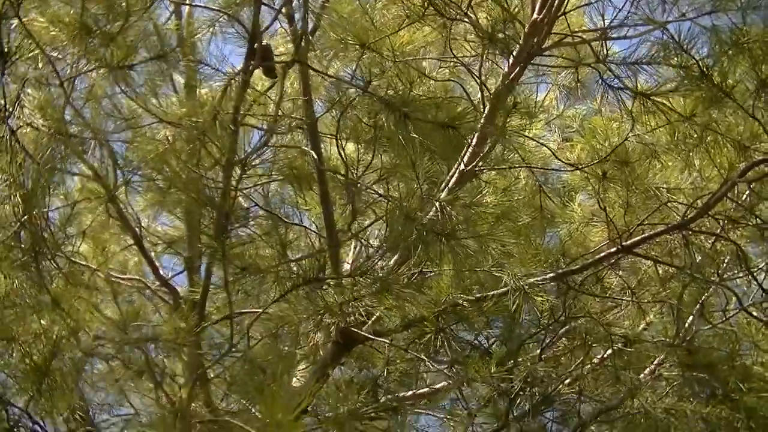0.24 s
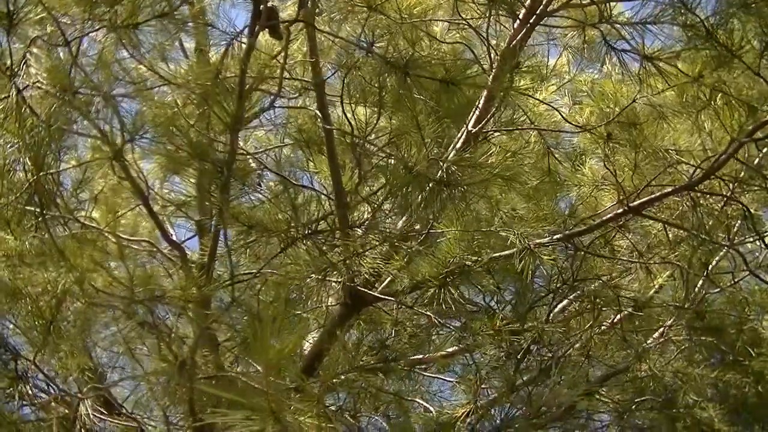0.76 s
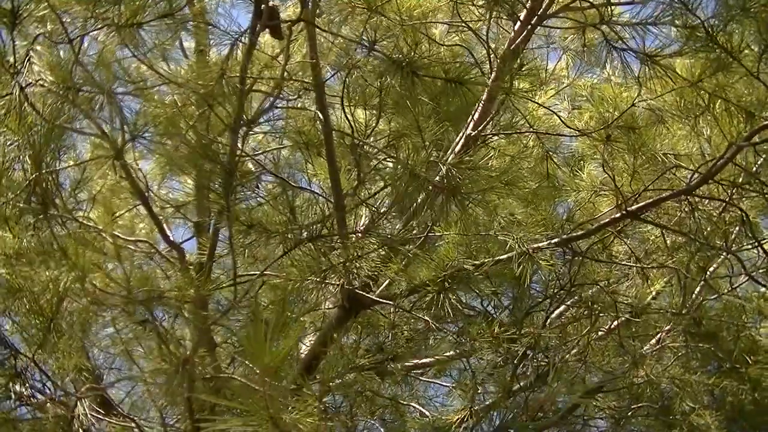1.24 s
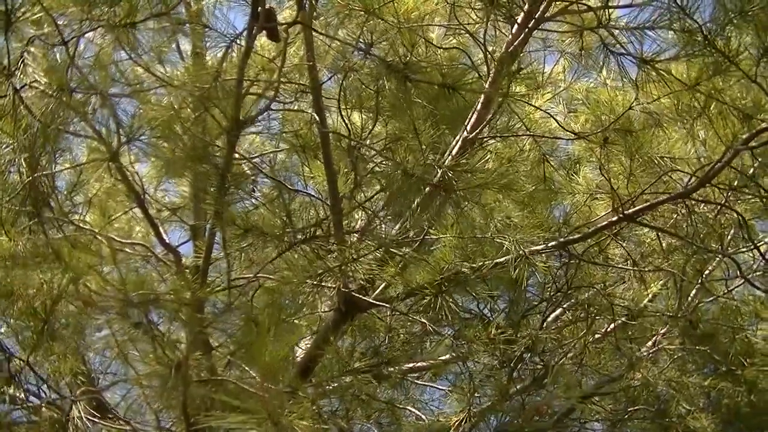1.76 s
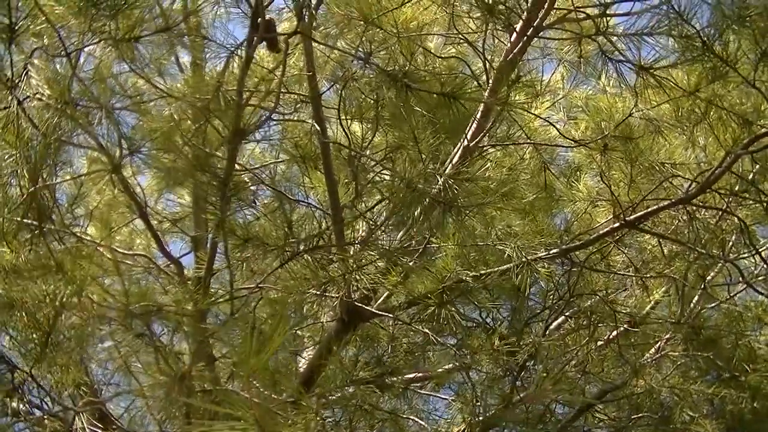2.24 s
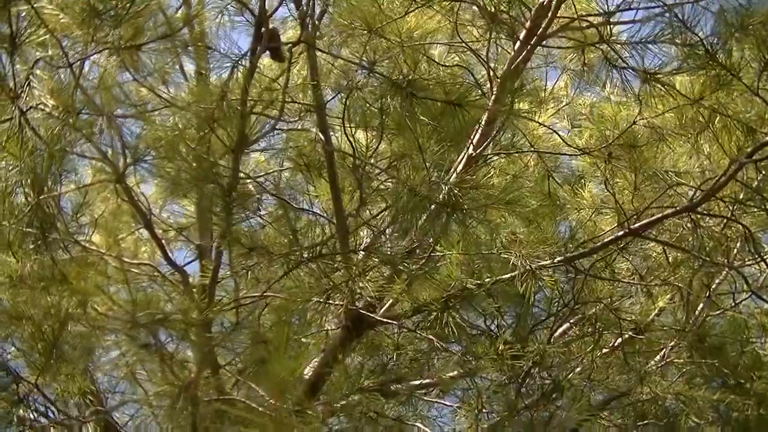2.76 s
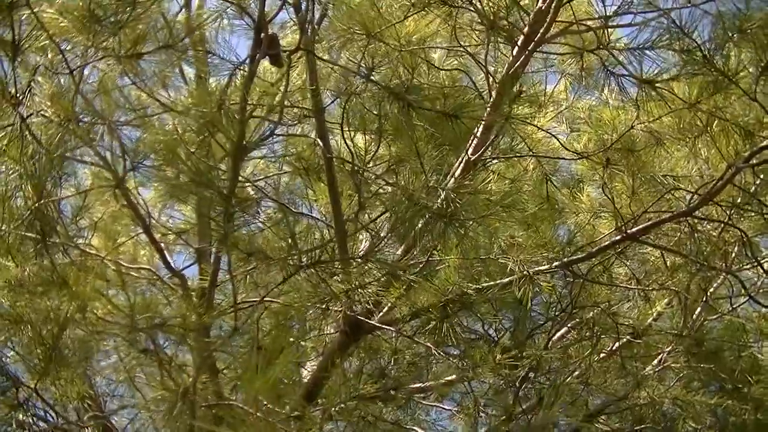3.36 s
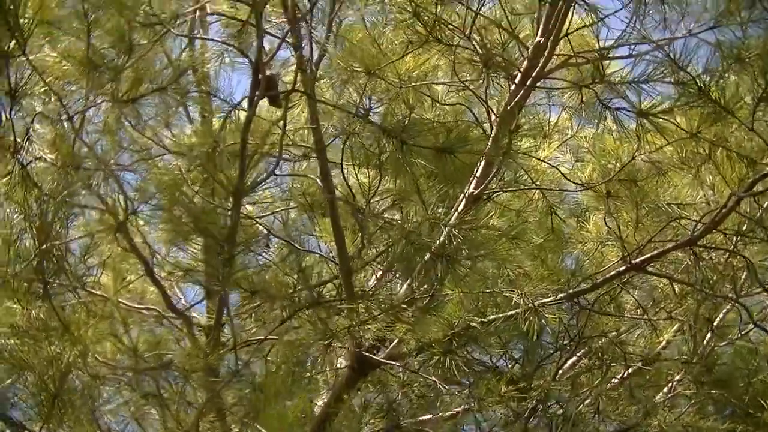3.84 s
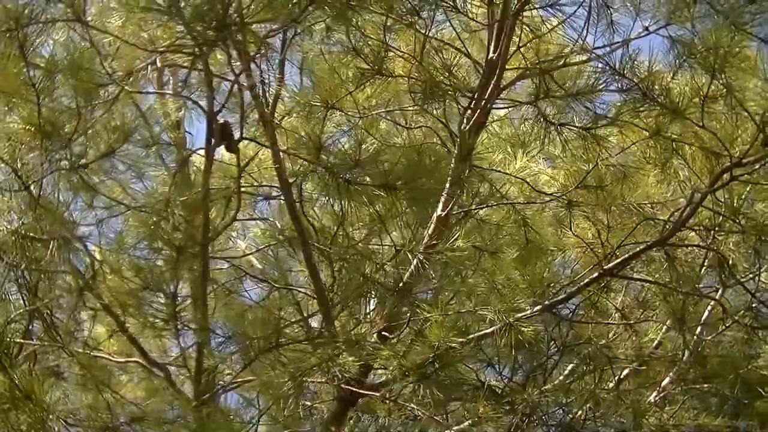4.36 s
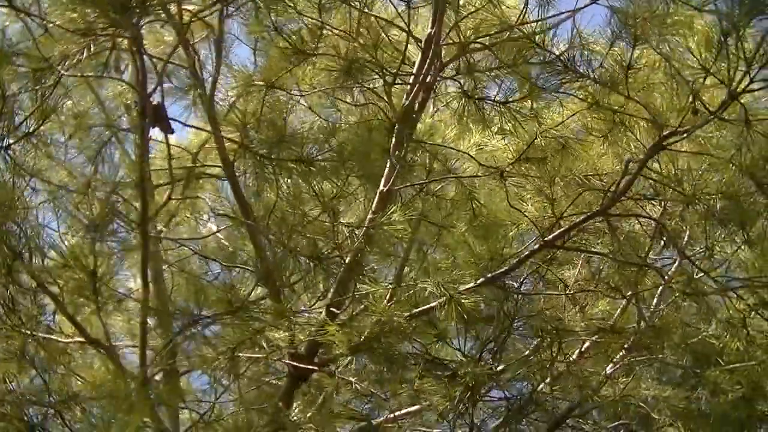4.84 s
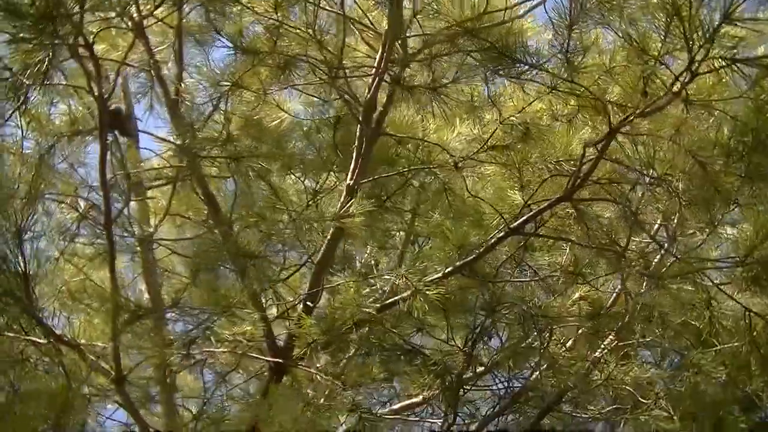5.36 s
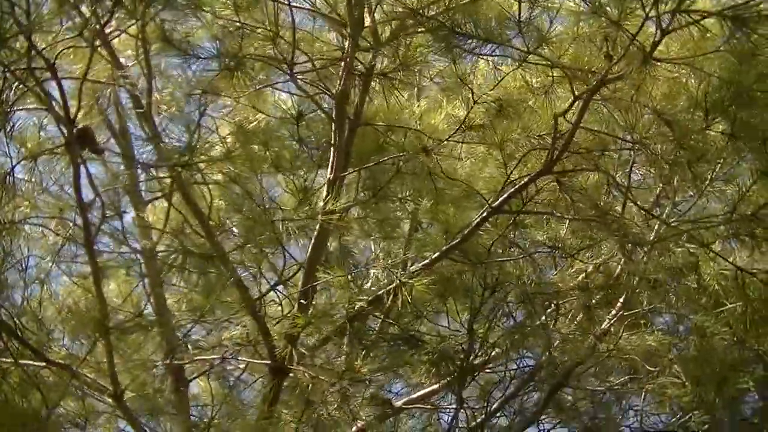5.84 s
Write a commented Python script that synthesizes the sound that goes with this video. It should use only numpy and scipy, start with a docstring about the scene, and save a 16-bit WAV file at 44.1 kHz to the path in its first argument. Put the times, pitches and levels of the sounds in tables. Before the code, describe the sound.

One cicada's high, even buzz turns into fast pulses and grows louder, over soft low gusts outdoors.

```python
"""In a pine outdoors, one cicada sings: an even, slowly sagging buzz that breaks into throbs,
about eleven a second, and grows louder. Its two tymbals buckle in turn, rib by rib; each click
rings the abdomen, which opens with every throb. Light gusts thump on the microphone over faint
rustles and a distant murmur."""
import sys
import numpy as np
from scipy import signal
from scipy.fft import rfft, irfft
from scipy.io import wavfile
from scipy.ndimage import uniform_filter1d

SR = 44100
rng = np.random.default_rng(int(sys.argv[2]) if len(sys.argv) > 2 else 0)


def digitize_waveform(pressure):
    """Quantize a signal to 16-bit integers and store it at the path in sys.argv[1].

    Rows of a 2-D input are taken as channels; values are limited to [-1, 1].
    """
    field = np.atleast_2d(pressure).T
    bounded = np.clip(field, -1, 1)
    quanta = np.round(bounded * 32767).astype(np.int16)
    wavfile.write(sys.argv[1], SR, quanta)


N = 268569
TIME = np.arange(N) / SR


def gain_of(db):
    """Decibels to amplitude."""
    return 10 ** (np.asarray(db) / 20)


def pan(db):
    """Stereo gains that put the left channel db above the right."""
    return gain_of([[db / 2], [-db / 2]])


def follow(rows, t=TIME):
    """Plays a breakpoint table: one automation curve for each column after the first."""
    times, *columns = np.transpose(rows)
    return [np.interp(t, times, column) for column in columns]


def eq_gain(eq, hz):
    """Gain of an EQ curve drawn on a log-frequency axis."""
    f, db = np.transpose(eq)
    return gain_of(np.interp(np.log(hz + 1), np.log(f), db))


def unit_rms(x):
    """Scales to rms 1."""
    return x / np.sqrt(np.mean(x ** 2) + 1e-20)


def leveller(x, size=900):
    """Holds the short-time rms at 1, so that tone moves leave the level alone."""
    power = uniform_filter1d(uniform_filter1d(x ** 2, size), size)
    return x / np.sqrt(abs(power) + 1e-9)


def drift(hz):
    """A smooth random modulator of rms 1, moving at rates up to hz."""
    f = np.fft.rfftfreq(N, 1 / SR)
    return unit_rms(irfft(rfft(rng.standard_normal(N)) / (1 + (f / hz) ** 4), N))


def stereo_noise(eq, correlation):
    """A bed of shaped noise; a correlation of 1 is mono, a negative one out of phase."""
    f = np.fft.rfftfreq(N, 1 / SR)
    left, other = irfft(rfft(rng.standard_normal((2, N))) * eq_gain(eq, f), N)
    right = correlation * left + np.sqrt(1 - correlation ** 2) * other
    return unit_rms(np.array([left, right]))


def treble(x, hz):
    """The part of x above hz, with a gentle edge."""
    return signal.sosfiltfilt(signal.butter(2, hz, "high", fs=SR, output="sos"), x)


def shelf(x, hz, db):
    """A high shelf whose gain can be automated."""
    return x + (gain_of(db) - 1) * treble(x, hz)


def bell(x, hz, width_hz, db):
    """A resonant boost or cut that sweeps along the curve hz."""
    carrier = np.exp(2j * np.pi * np.cumsum(hz) / SR)
    pole = np.exp(-np.pi * width_hz / SR)
    band = 2 * (carrier * signal.lfilter([1 - pole], [1, -pole], x / carrier)).real
    return x + (gain_of(db) - 1) * band


def ring(x, eq, size=2048, low_cut_hz=2500):
    """Gives clicks a minimum-phase ring with the tone of eq and the bass thinned out."""
    f = abs(np.fft.fftfreq(size, 1 / SR))
    log_gain = np.log(eq_gain(eq, f) * np.clip(f / low_cut_hz, .02, 1))
    response = np.fft.ifft(np.exp(signal.hilbert(log_gain).conj())).real
    return signal.oaconvolve(x, response / np.linalg.norm(response))[:N]


def disperse(x, spread_ms, size=512):
    """Smears clicks: each frequency leaves at its own random moment, and the tone stays the same."""
    hz = np.fft.rfftfreq(size, 1 / SR)
    knots_hz = np.arange(0, SR / 2, 500)
    scatter = np.clip(rng.standard_normal(len(knots_hz)), -2, 2)
    delay_ms = 2 + spread_ms * np.interp(hz, knots_hz, scatter)
    response = irfft(np.exp(-2j * np.pi * np.cumsum(delay_ms / 1000) * hz[1]))
    return signal.oaconvolve(x, response)[2 * SR // 1000:][:N]  # trim the 2 ms pre-delay


# Fader ride of the far bed: t/s, relative level/dB
MURMUR_RIDE = [(0, -57.5), (1.5, -56), (3.0, -54), (4.5, -55), (5.9, -54.5)]
# Its tone, a low murmur with a high hiss near 8 kHz: f/Hz, level/dB
MURMUR_EQ = [(25, -11), (70, 7), (150, 6), (230, 0.5), (320, 0), (520, -3), (850, 0), (1250, -7),
             (2000, -13.5), (3200, -16), (8000, -2), (15000, -58.5)]
# Faint far hums: start/s, end/s, f/Hz, level/dB
HUMS = [(0.603, 2.31, 251.6, -60), (1.693, 3.4, 417, -63)]


def distance(murmur_db=6.0, low_db=-56.5, hum_waver_hz=1.16):
    """A soft far murmur and hiss; a low layer fades in under it and two hums come and go."""
    far = stereo_noise(MURMUR_EQ, correlation=0.7) * gain_of(follow(MURMUR_RIDE)[0] + murmur_db)
    low_eq = [(100, -38), (300, -3), (450, -6.5), (1000, -20.0), (4000, -59)]
    far += stereo_noise(low_eq, correlation=1.0) * gain_of(low_db) * TIME / TIME[-1]
    for start, end, hz, db in HUMS:
        fade = np.sin(np.pi * np.clip((TIME - start) / (end - start), 0, 1))
        phase = 2 * np.pi * np.cumsum(hz + hum_waver_hz * drift(4.5)) / SR
        far += gain_of(db) * fade * np.sqrt(2) * np.sin(phase)
    return far


# Close rustle cues: centre/s, length/s, level/dB
RUSTLES = [(3.73, .3, -64.5), (4.107, 0.13, -62), (4.341, 0.12, -61), (5.454, 0.23, -58), (5.7, 0.12, -60),
           (5.88, 0.057, -59)]
# Their midrange tone: f/Hz, level/dB
RUSTLE_EQ = [(300, -4), (900, -5), (1800, 1), (3000, -6.5), (6000, -17)]


def rustles(grain_db=4.0, grain_hz=60):
    """Short swells of noise, made grainy by a fast flutter in level."""
    swell = sum(gain_of(db) * np.exp(-(2 * (TIME - t) / length) ** 2) for t, length, db in RUSTLES)
    return stereo_noise(RUSTLE_EQ, correlation=0.74) * swell * gain_of(grain_db * drift(grain_hz))


# Gust cues: start/s, hold/s, relative level/dB
GUSTS = [(0, .19, -49.5), (.2, 0.25, -46), (0.834, 0.22, -46.5), (1.004, 0.34, -41.5), (1.502, 0.12, -39),
         (1.853, 0.34, -48.5), (2.256, 0.49, -46), (3.615, 0.43, -42), (4.116, 0.034, -44),
         (4.203, 0.038, -42), (4.295, 0.049, -46), (4.397, 0.1, -45.5), (5.19, 0.11, -46.5),
         (5.354, 0.23, -47), (5.976, 0.062, -41)]


def gusts(breeze_db=-56, attack_s=0.02, release_s=0.017, lumps_db=2.5, lumps_hz=14):
    """The wind's lumpy envelope: each gust builds, holds and dies above a light breeze."""
    strength = np.full(N, gain_of(breeze_db))
    for start, hold, db in GUSTS:
        before = np.maximum(start - TIME, 0) / attack_s
        after = np.maximum(TIME - start - hold, 0) / release_s
        strength = np.maximum(strength, gain_of(db) * np.exp(-before - after))
    return strength * gain_of(lumps_db * drift(lumps_hz))


# Rumble of wind on the microphone: f/Hz, level/dB
WIND_EQ = [(15, -57), (35, 0), (65, 3.5), (105, 0.5), (160, -5.5), (220, -15.5), (320, -25), (600, -55),
           (1500, -50)]
# Eddy hits: t/s, relative peak/dB, f/Hz, left minus right/dB
THUMPS = [(0.398, -21, 132, -7), (1.037, -19, 146, -4), (1.189, -22, 102, -2), (1.308, -21, 106, -4),
          (3.661, -22, 76, 1), (3.914, -19, 139, -6), (4.463, -23, 119, -7), (5.347, -22, 99, -5),
          (5.993, -18, 152, 8), (6.007, -17, 198, -2), (6.02, -9, 144, 4)]


def wind(gust_db=6.5, thump_db=1.0, thump_cycles=0.32, pan_db=-3.5, lull_db=-55):
    """Turbulence pushes the two microphone ports in opposite senses; single eddies land as thumps."""
    blow = gusts()
    strength = gain_of(gust_db) * blow / np.sqrt(1 + (gain_of(lull_db) / blow) ** 4)  # gate the lulls
    air = stereo_noise(WIND_EQ, correlation=-0.79) * strength * pan(pan_db)
    for (t, db, hz, side_db), offset in zip(THUMPS, rng.random(len(THUMPS))):
        cycles = (TIME - t) * hz
        swell = 1 / np.cosh(np.minimum(abs(cycles) * np.sqrt(2) / thump_cycles, 20))
        phase = 2 * np.pi * (cycles + offset)
        eddy = np.array([np.cos(phase), -np.cos(phase + 0.34)]) * pan(side_db)
        air = air * (1 - swell) + gain_of(db + thump_db) * swell * eddy  # the rumble ducks under it
    return air


def branches(x, pan_db=-2.0, lag_samples=0.29, wet_db=-10, t60_s=.05):
    """Sets the song louder and a trace later on the right, with a short scatter off trunks and needles."""
    t = np.arange(SR // 4) / SR
    taps = rng.standard_normal((2, len(t))) * (rng.random((2, len(t))) < .08)  # sparse reflections
    taps *= gain_of(-60 * t / t60_s) * (t > .001)
    taps /= np.linalg.norm(taps, axis=1, keepdims=True)
    late = (1 - lag_samples) * x + lag_samples * np.roll(x, 1)
    direct = np.array([x, late]) * pan(pan_db)
    return direct + gain_of(wet_db) * signal.oaconvolve(x[None], taps, axes=1)[:, :N]


# Base groove of the tymbals: t/s, stroke rate/Hz, rib spacing/ms, lag of the second tymbal/ms
STROKES = [(0, 189, 1.33, .3), (.42, 188.5, 1.35, .3), (.96, 181, 1.4, .3), (1.5, 180.5, 1.45, .3),
           (2.36, 175, 1.5, .3), (2.42, 142, 1.75, 0), (3.0, 154, 1.65, 0), (3.7, 161, 1.65, 0),
           (4.2, 161, 1.76, 0), (5.0, 156, 1.78, 0)]
# Rib accents in buckling order, scaled by rib_fade: level/dB
RIB_ACCENTS = [0, -.5, -5, -13]


def tymbals(pace, tension, second_db, rib_fade, jitter_ms=.02, scatter_db=1.45, crisp_db=3.0):
    """Left and right tymbal pull in turn; each stroke buckles a row of ribs, one click to a rib."""
    stroke_hz, rib_ms, lag_ms = follow(STROKES)
    stroke_count = np.floor(np.cumsum(stroke_hz * pace) / SR)
    strokes = np.flatnonzero(np.diff(stroke_count))
    is_second = np.arange(len(strokes)) % 2
    pull_ms = is_second * lag_ms[strokes] + jitter_ms * rng.standard_normal(len(strokes))
    spacing_ms = (rib_ms / tension)[strokes]
    song = np.zeros(N)
    for rib, db in enumerate(RIB_ACCENTS):
        slip, accent = rng.standard_normal((2, len(strokes)))
        delay_ms = pull_ms + rib * spacing_ms + jitter_ms * slip
        onsets = strokes + np.round(delay_ms * SR / 1000).astype(int)
        height = gain_of(db * rib_fade[strokes] + is_second * second_db[strokes] + scatter_db * accent)
        clicks = np.bincount(onsets, height, N)[:N]
        second_clicks = np.bincount(onsets, height * is_second, N)[:N]
        clicks += (gain_of(2 * second_db) - 1) * treble(second_clicks, hz=9800)  # weaker is also duller
        clicks = shelf(clicks, hz=10800, db=crisp_db * (1 - rib))  # each rib is duller than the last
        song += disperse(clicks, spread_ms=.62)
    return song


# Five tones of the body, from the opening buzz to the late throbs: f/Hz, level/dB
OPENING_EQ = [(3400, -30), (4000, -19), (4500, -2.5), (4950, -18), (5300, -10), (5700, -15), (6200, 0),
              (7450, 0), (8350, -18), (8680, -9), (9100, -17), (10250, -15), (11300, -25), (13000, -19),
              (14200, -33)]
BUZZ_EQ = [(3200, -31), (4000, -21), (4580, -9.5), (4950, -15), (5400, -10), (5830, -15), (6250, -2),
           (6850, 1), (7600, -1.5), (8370, -16), (8680, -8.5), (9100, -18), (10550, -15.5), (11800, -24),
           (12800, -16), (14200, -35)]
EARLY_THROB_EQ = [(3000, -36), (3850, -20.5), (4200, -12), (4800, -11.5), (5200, -12), (5600, -12.5),
                  (6750, 1), (7400, -2), (8400, -14), (10500, -18), (11200, -21), (12900, -20),
                  (14200, -30), (15700, -37)]
FULL_THROB_EQ = [(3000, -29.5), (3950, -26), (4400, -4.5), (5000, -6.5), (5700, -1.5), (6200, -7),
                 (6850, 2.5), (7550, 3.5), (8400, -8), (9600, -13), (10600, -8), (11200, -19.5),
                 (13400, -18.5), (15700, -31)]
LATE_THROB_EQ = [(3000, -31.5), (4000, -23), (4450, -7.5), (5800, -8), (6200, -4), (6800, -2.5),
                 (7550, 3.5), (8400, -8), (10500, -10), (11200, -19.5), (13700, -17), (15000, -34),
                 (15700, -32)]
# In and out points of the four crossfades between them: t/s
CROSSFADES = [.3, 1.101, 2.361, 2.45, 3.1, 3.9, 4.7, 5.3]


def body(clicks):
    """The clicks ring the insect's body: each tone holds for a while, then blends into the next."""
    tones = [OPENING_EQ, BUZZ_EQ, EARLY_THROB_EQ, FULL_THROB_EQ, LATE_THROB_EQ]
    stage = np.interp(TIME, CROSSFADES, (np.arange(len(CROSSFADES)) + 1) // 2)
    return sum(np.maximum(1 - abs(stage - k), 0) * ring(clicks, eq) for k, eq in enumerate(tones))


# Upper resonances: resting f/Hz, rise/Hz, width/Hz, gain when fully open/dB
ARCHES = [(7940, 690, 1800, -1.5), (12000, 2300, 800, 6)]


def upper_resonances(song, throb_phase, openness):
    """The opening abdomen sweeps two high resonances up and back with every throb."""
    arch = np.sin(np.pi * throb_phase) ** 2
    for hz, rise_hz, width_hz, db in ARCHES:
        song = bell(song, hz + rise_hz * arch, width_hz, db * openness)
    return song


# Tempo of the pumping abdomen, quick at first, then settling: t/s, throb rate/Hz
THROB_TEMPO = [(2.374, 14.25), (2.8, 11.685), (4.6, 10.95), (5.0, 11.07)]
# One throb at depth 1: phase/cycles, level/dB, abdomen f/Hz, stroke pace/ratio, overtones/dB
THROB_SHAPE = [(0.0, -6, 6430, .66, -1), (.09, -11, 6700, .7, 3), (.15, -7, 5650, .88, -1.5),
               (.24, -0.5, 5320, 1, -3), (.43, -0.04, 5810, 0.98, 5.5), (.53, 1.9, 6800, 1.0, 1.5),
               (.62, -1.5, 7150, 1.0, 5), (.8, -4, 6800, 0.93, 1), (1.0, -9, 6780, .66, 3)]
# Phrasing: t/s, second tymbal level/dB, rib fade/ratio, throb depth/ratio, abdomen boost/dB
PHRASING = [(0, 1.5, 1.55, 0.26, 3), (2.36, -4, 2.4, 0.29, -1), (2.42, 2.5, 0.57, 0.35, 6),
            (2.65, 2, 0.26, 1, 5.5), (3.1, 1, 0.22, 1.28, 2.5), (3.7, -1, 0.25, 1.14, 8),
            (4.3, 0, 0.38, .95, 11.5), (5.0, 1.5, 0.39, 0.87, 9), (6.09, 1, 0.5, 0.94, 7)]
# The singer's effort sags in the buzz, catches briefly, then grows with the throbs: t/s, level/dB
EFFORT = [(0, -39.5), (1.1, -43), (2.372, -44), (2.382, -54), (2.392, -42.5), (2.65, -38.5), (3.1, -37),
          (3.25, -36), (3.55, -34.5), (4.2, -31.5), (4.8, -32), (4.93, -33), (5.0, -31.5), (6.09, -31)]


def cicada(snap_share=0.92, snap_rest_db=-9.0, uneven_db=0.58):
    """Tymbal clicks ring the body; in each throb the abdomen swells the sound and sweeps its tone."""
    second_db, rib_fade, depth, boost_db = follow(PHRASING)
    throbbing = TIME >= THROB_TEMPO[0][0]
    throb_phase = np.cumsum(throbbing * follow(THROB_TEMPO)[0]) / SR % 1
    swell_db, abdomen_hz, pace, overtones_db = follow(THROB_SHAPE, throb_phase)

    pace = 1 + throbbing * depth * (pace - 1)  # the muscles slacken between throbs
    waver = 1 + np.where(throbbing, .012, .0025) * drift(9)
    tension = 1 + throbbing * .018 * drift(8)  # no two throbs are quite alike
    song = body(tymbals(pace * waver, tension, second_db, rib_fade))

    song = bell(song, abdomen_hz * tension, width_hz=500, db=boost_db)
    song = upper_resonances(song, throb_phase, openness=boost_db / boost_db.max())
    song = shelf(song, hz=8600, db=depth * overtones_db)  # the treble flickers within each throb
    snap_db = snap_share * depth * (snap_rest_db - swell_db)  # the ribs' snap swells less than the body
    song = shelf(song, hz=11400, db=snap_db)

    level_db = follow(EFFORT)[0] + throbbing * depth * swell_db + uneven_db * drift(16.6)
    return leveller(song) * gain_of(level_db)


def scene():
    """The mix, back to front: far bed, rustles, wind, and the cicada in its tree."""
    return distance() + rustles() + wind() + branches(cicada())


def record(dry, cutoff_hz=15800):
    """A steep low-pass on the master."""
    low_pass = signal.firwin(511, cutoff_hz, window=("kaiser", 9), fs=SR)
    return signal.oaconvolve(dry, low_pass[None], "same")


dry = scene()
out = record(dry)
digitize_waveform(out)
```